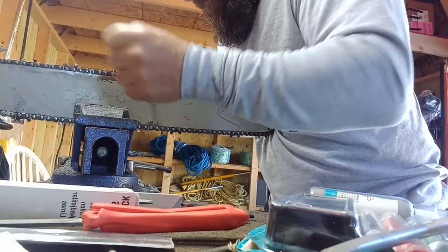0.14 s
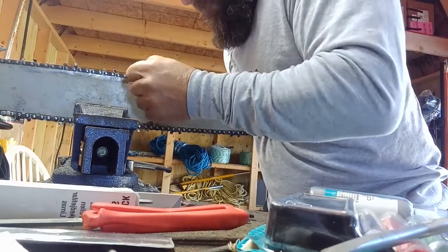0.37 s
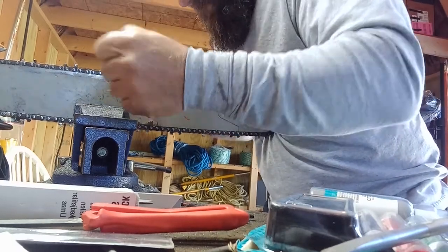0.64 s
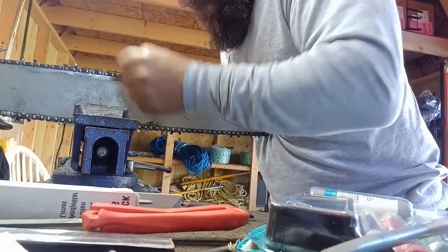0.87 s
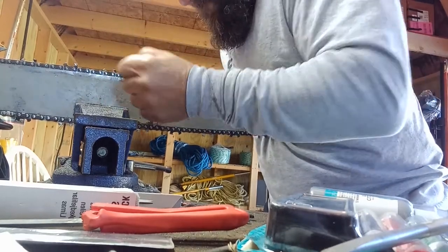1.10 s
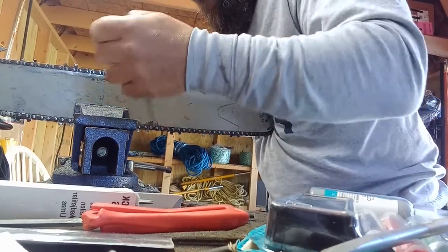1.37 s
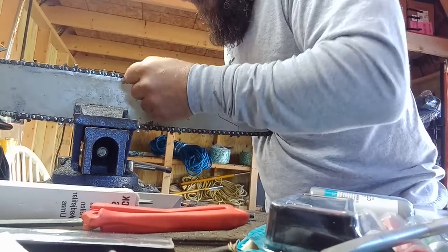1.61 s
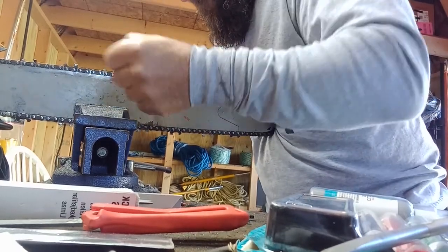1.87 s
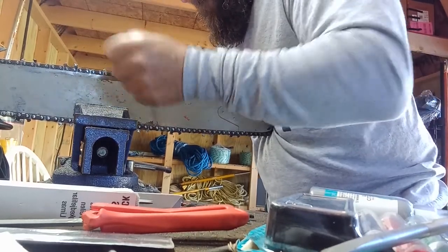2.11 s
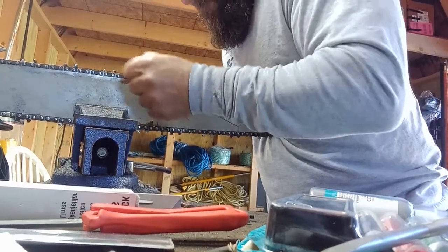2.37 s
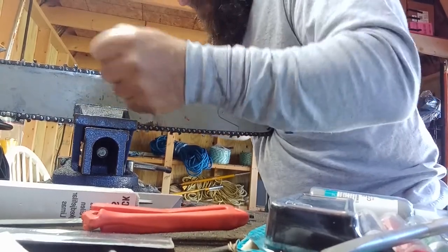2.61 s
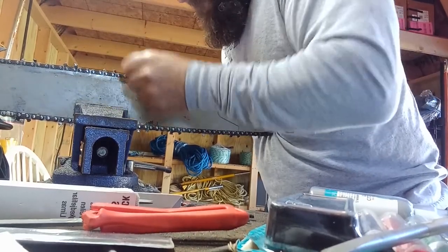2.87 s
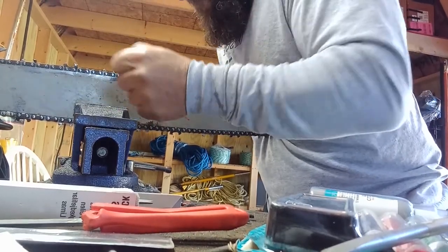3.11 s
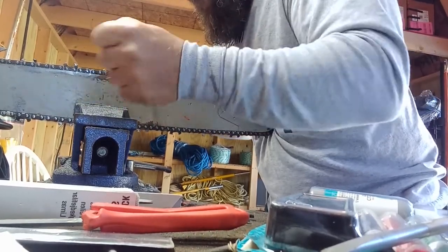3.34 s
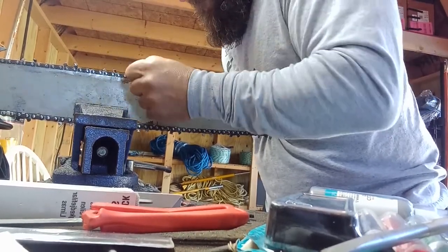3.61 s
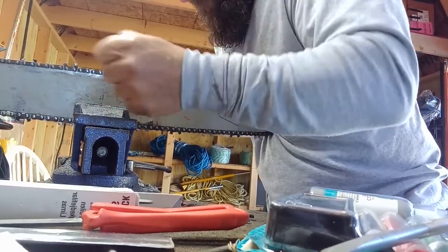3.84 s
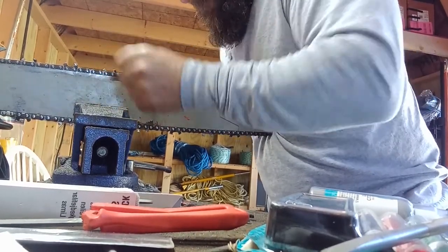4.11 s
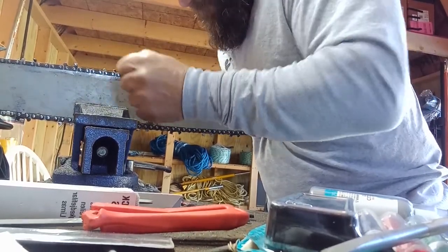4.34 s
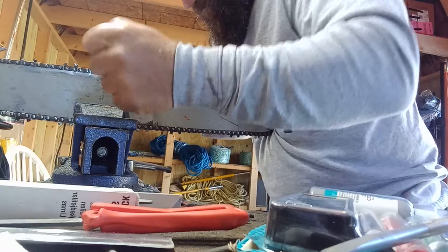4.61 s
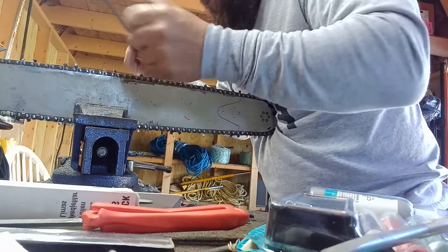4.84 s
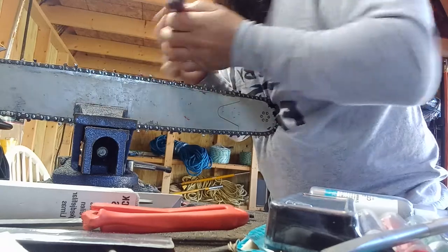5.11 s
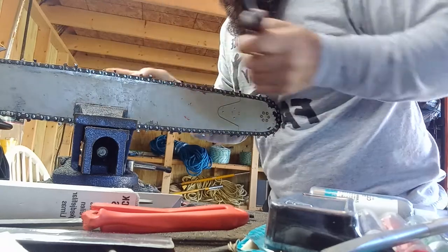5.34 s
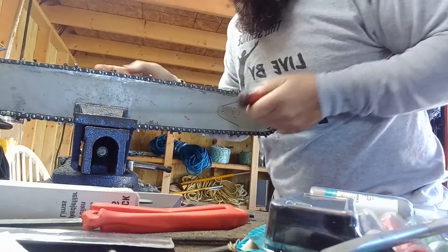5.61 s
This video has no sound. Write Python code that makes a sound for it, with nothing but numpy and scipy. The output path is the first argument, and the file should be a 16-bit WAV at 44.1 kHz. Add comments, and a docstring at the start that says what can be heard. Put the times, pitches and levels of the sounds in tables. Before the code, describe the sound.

In a small wooden shed, a round file makes rasping strokes on a chainsaw chain clamped in a vise, about one every two thirds of a second. Each has gritty mid scrape, ringing steel, jingling links and low bench boom, with small knocks at its ends. Then nearly silent, faint brushing, and a hard steel click. Stereo microphones stand close, on the bench.

```python
"""A round file makes eight strokes across a saw-chain cutter, its steel bar clamped in a vise on a wooden bench.
Random tooth catches ring bar and file, rasp and jingle the links, with chips hissing on top; knocks frame the
strokes. Faint hisses mark the file drawn back, later a hand and sleeve brushing the chain; near the end steel
clicks down. The bench booms, as driven low resonances, into two microphones standing on it; decaying noise
gives the echoes of the wooden shed, filtered noise the quiet air."""
import sys
import numpy as np
from scipy import signal
from scipy.fft import rfft, irfft, next_fast_len
from scipy.io import wavfile

SR = 44100
rng = np.random.default_rng(int(sys.argv[2]) if len(sys.argv) > 2 else 0)


def unload_wav(signal):
    """Save mono or channel-first audio to the path in sys.argv[1] as 16-bit WAV at rate SR, clipped to [-1, 1]."""
    wavfile.write(
        sys.argv[1],
        SR,
        np.round(np.clip(np.atleast_2d(signal).T, -1, 1) * 32767).astype(np.int16),
    )


def gain_from_db(level_db):
    """Convert decibel levels to linear amplitude factors (20 dB per decade)."""
    decades = np.asarray(level_db, float) / 20
    return 10 ** decades


N = 252163

# steel set down on the bench: (time [s], level [dB])
STEEL_CLICK = [(5.6075, -7.5)]
USUAL_BITE_DB, USUAL_TREBLE_DB, USUAL_RING_DB = -31, -39, -38


def rms_one(x):
    """Scales a signal to rms 1."""
    return x / np.sqrt(np.mean(x ** 2) + 1e-20)


def in_time(rows):
    """Gains at every sample from a dB table with time first, silent outside its span."""
    s, *columns = np.transpose(rows)
    t = np.arange(N) / SR
    return np.array([gain_from_db(np.interp(t, s, column, -200, -200)) for column in columns])


def at_hz(points, hz):
    """Reads a spectrum table along a logarithmic pitch axis."""
    points = np.array(points)
    return np.interp(np.log(hz + 1), np.log(points[:, 0] + 1), points[:, 1])


def colour(x, spectrum):
    """Causal (minimum-phase) filter with the given spectrum; white rms 1 comes out at rms 1."""
    size = 8192
    gain = gain_from_db(at_hz(spectrum, np.fft.rfftfreq(size, 1 / SR)))
    cepstrum = irfft(np.log(gain))
    # folding the cepstrum forward puts the energy as early as it can be
    cepstrum[1:size // 2] *= 2
    cepstrum[size // 2 + 1:] = 0
    response = irfft(np.exp(rfft(cepstrum)))[:size // 2]
    response = response / np.sqrt(np.sum(response ** 2))
    return signal.fftconvolve(np.atleast_2d(x), [response], axes=1)[:, :N]


def resonate(x, modes):
    """Parallel resonances, signs alternating; each width sets how fast its mode dies."""
    out = 0
    for k, (hz, width_hz, db) in enumerate(modes):
        r = np.exp(-np.pi * abs(width_hz) / SR)
        a = [1, -2 * r * np.cos(2 * np.pi * hz / SR), r * r]
        b = [(1 - r * r) / 2, 0, (r * r - 1) / 2]
        out = out + (-1) ** k * gain_from_db(db) * signal.lfilter(b, a, x + 1e-18)
    return out


def drift(rate_hz):
    """Slow chance, rms 1: noise through two equal low-pass poles, computed at every 64th sample."""
    r = np.exp(-128 * np.pi * rate_hz / SR)
    noise = rng.standard_normal(N // 64 + 2002)
    slow = signal.lfilter([1], [1, -2 * r, r * r], noise)[2000:]
    return np.interp(np.arange(N) / 64, np.arange(len(slow)), rms_one(slow))


def wandering(x, modes, wander_db, rate_hz):
    """The contact point travels along the file, so each mode is driven now harder, now softer."""
    out = 0
    for k, mode in enumerate(modes):
        drive = x * gain_from_db(wander_db * drift(rate_hz))
        out = out + (-1) ** k * resonate(drive, [mode])
    return out


def grains(per_s, spread_db):
    """Random contacts of uneven size and either sign; rms 1."""
    sizes = gain_from_db(spread_db * np.minimum(rng.exponential(1, N), 4)) * rng.choice([-1, 1], N)
    return rms_one(sizes * (rng.random(N) < per_s / SR))


def impulses(times, sizes, contact_s):
    """Noise bursts that start hard and fall by a factor e in each contact time."""
    train = np.zeros(N)
    train[np.round(np.asarray(times) * SR).astype(int)] = sizes
    dying = np.exp(-np.arange(SR // 4) / (contact_s * SR))
    return signal.fftconvolve(train, dying)[:N] * rng.choice([-1, 1], N)


def plateaus(rows):
    """Gain that fades in, holds and fades out for each row, with 12 ms fades."""
    t = np.arange(N) / SR
    gain = 0
    for s, length, db in rows:
        gain = gain + gain_from_db(db) * np.clip(np.minimum(t - s, s + length - t) / 0.012, 0, 1)
    return gain


def follow(level_db, usual_db, law):
    """A layer's dB from the level that drives it."""
    return law[0] + law[1] * (level_db - usual_db)


def stroke_levels():
    """Bite, treble and ring of the file in dB at every sample, near silent between strokes."""
    # one curve a stroke, from setting the file down to its stop:
    # (time [s], bite level [dB], treble level [dB], level of the file's ring [dB])
    strokes = [
        [(0.0, -30.5, -33.5, -37), (0.024, -35, -39, -43), (0.036, -37.5, -37, -41), (0.048, -44.5, -48, -45),
         (0.052, -36, -51, -48)],
        [(0.301, -48.5, -58.5, -60.5), (0.309, -44, -48, -48.5), (0.349, -45.5, -54, -54),
         (0.415, -42.5, -49, -46), (0.445, -30, -39.5, -33), (0.483, -30, -36.5, -31), (0.537, -28, -39, -43.5),
         (0.623, -33, -34.5, -33.5), (0.679, -37.5, -41.5, -43), (0.693, -33.5, -36.5, -41.5),
         (0.709, -55.5, -48, -52.5), (0.715, -39, -47.5, -53.5)],
        [(0.951, -47, -49, -54.5), (0.957, -43, -47, -45), (0.999, -44.5, -61, -60.5), (1.047, -49, -55.5, -52),
         (1.075, -31.5, -38.5, -36.5), (1.109, -29.5, -37, -31), (1.139, -36, -37, -32.5),
         (1.159, -30.5, -39.5, -39.5), (1.193, -28.5, -35, -39.5), (1.225, -30.5, -36.5, -35.5),
         (1.291, -33, -37.5, -46.5), (1.36, -64.5, -56.5, -62)],
        [(1.603, -51.5, -60.5, -58.5), (1.619, -41, -48, -55.5), (1.689, -58, -65.5, -68),
         (1.711, -39, -45.5, -40.5), (1.741, -33, -40.5, -33), (1.799, -32.5, -37, -39.5),
         (1.833, -28.5, -37.5, -39), (1.891, -31.5, -35, -31.5), (1.961, -37, -40.5, -44.5),
         (1.973, -37, -38.5, -41), (1.983, -45, -46.5, -49), (1.988, -33, -45.5, -45)],
        [(2.203, -57, -61.5, -62), (2.207, -50.5, -50, -57), (2.245, -38, -44, -42), (2.271, -50.5, -55.5, -58),
         (2.313, -42, -50, -50), (2.353, -57.5, -63, -63), (2.385, -34, -38, -38), (2.411, -27, -33, -35.5),
         (2.489, -27, -39.5, -38), (2.505, -28, -35, -34.5), (2.651, -44, -44, -44.5),
         (2.66, -45, -49.5, -49.5)],
        [(2.972, -49.5, -56, -59), (2.976, -44, -52, -53), (3.044, -41.5, -44.5, -42), (3.056, -35, -41.5, -37),
         (3.088, -37.5, -40.5, -33.5), (3.138, -28, -40, -45.5), (3.172, -37.5, -40.5, -36.5),
         (3.228, -37, -43, -39), (3.262, -39.5, -43.5, -52), (3.28, -35.5, -39, -41), (3.294, -66, -51, -54),
         (3.298, -43, -52.5, -54)],
        [(3.575, -71, -60.5, -66), (3.589, -54.5, -66.5, -61), (3.605, -48, -54.5, -56.5),
         (3.661, -38.5, -46.5, -42), (3.677, -39.5, -49, -44.5), (3.709, -33.5, -36, -36),
         (3.775, -30.5, -39.5, -37.5), (3.805, -34.5, -36, -39), (3.875, -37.5, -38, -33.5),
         (3.925, -29.5, -40.5, -48.5), (3.935, -50, -50, -51), (3.94, -28.5, -48, -49.5)],
        [(4.199, -58.5, -54.5, -60.5), (4.209, -47, -55.5, -54), (4.269, -63, -63, -64),
         (4.307, -36.5, -46.5, -38.5), (4.345, -31, -34.5, -39), (4.395, -31, -39, -38.5),
         (4.431, -26, -35.5, -38), (4.487, -26, -34.5, -35), (4.505, -29.5, -35, -36.5),
         (4.539, -32.5, -39.5, -38.5), (4.629, -36.5, -41, -44.5), (4.66, -52, -54, -54.5)],
    ]
    return 20 * np.log10(sum(in_time(stroke) for stroke in strokes))


def quiet_air():
    """Steady filtered noise, independent at the two microphones."""
    # spectrum of the quiet: (frequency [Hz], relative level [dB])
    air_spectrum = [(18, -50.5), (30, -13), (48, 4.5), (88, 11.5), (165, -13.5), (328, -3), (1220, -19.5),
                    (4080, -23), (6900, -13), (8740, -30.5), (9460, -32), (13300, -15.5), (16000, -32)]
    return gain_from_db(-73.5) * colour(rng.standard_normal((2, N)), air_spectrum)


def shed(x):
    """Dense echoes off shelves and rafters, other ones at each microphone, treble dying first."""
    t = np.arange(SR // 2) / SR
    build_up = np.clip(t / 0.015, 0, 1)
    echoes = rng.standard_normal((2, len(t))) * gain_from_db(-60 * t / 0.28) * build_up   # 60 dB down in 0.28 s
    dull = signal.sosfilt(signal.butter(1, 880, fs=SR, output="sos"), echoes)
    echoes = dull + (echoes - dull) * gain_from_db(-60 * t / 0.65)   # the treble's extra loss
    return signal.fftconvolve(x, echoes / np.sqrt(np.sum(echoes ** 2) / 2), axes=1)[:, :N]


def two_ports(x):
    """The direct sound reaches the two microphone ports with a level and phase gap that depend on pitch."""
    # left against right: (frequency [Hz], level [dB])
    left_over_right = [(60, 1), (110, -6), (200, 6), (380, 3), (700, -9), (1290, -1), (2380, -2.5),
                       (4400, -10), (8120, -1), (15000, -21)]
    # left ahead of right: (frequency [Hz], phase [rad])
    left_leads = [(0, 1.5), (860, 1.01), (1720, 0.1), (2150, 6), (2410, -1.5), (4310, -11.5), (5510, -11.5),
                  (6120, -14.5), (7920, -15), (8530, -37), (10200, -13.5), (11200, -33.5), (11900, -33),
                  (16100, 5.5)]
    size = next_fast_len(N + SR // 10)
    hz = np.fft.rfftfreq(size, 1 / SR)
    phase = np.interp(hz, *np.transpose(left_leads))
    half_gap = gain_from_db(at_hz(left_over_right, hz) / 2) * np.exp(0.5j * phase)
    return irfft(np.array([half_gap, 1 / half_gap]) * rfft(x, size), size)[:, :N]


def evened(x, give):
    """A steady push keeps the swing even: the signal is divided by its own envelope; rms 1."""
    envelope = np.abs(signal.hilbert(x, next_fast_len(N))[:N])
    return rms_one(x / (envelope + give * np.std(x)))


def swing(bite_db, law, column):
    """Gain of bench modes that follow the bite, ring out after it, waver, and swell with each lurch."""
    # the vise lurches under the hand: (time [s], top level [dB], legs level [dB], boards level [dB])
    lurches = [(0.005, -16.5, -34.5, -31.5), (0.108, -18.5, -32.5, -39.5), (0.528, -15, -17.5, -23),
               (0.659, -19, -21, -35), (0.741, -23, -27, -39), (0.982, -30.5, -46, -45.5),
               (1.128, -16.5, -26.5, -41.5), (1.198, -22.5, -23.5, -29.5), (1.32, -30, -23.5, -44.5),
               (1.891, -19.5, -20.5, -32), (2.01, -27, -31, -31.5), (2.312, -32, -43.5, -39.5),
               (2.422, -11, -38.5, -43), (2.535, -9, -27, -23.5), (2.621, -15, -24.5, -33.5),
               (2.69, -23.5, -31.5, -36.5), (2.77, -32.5, -36.5, -55), (3.162, -13.5, -34.5, -37.5),
               (3.338, -23.5, -34.5, -40.5), (3.409, -34.5, -35, -57.5), (3.76, -16.5, -25.5, -39),
               (3.83, -13, -25.5, -28.5), (3.96, -17.5, -33, -35), (4.341, -18, -28.5, -44.5),
               (4.432, -15.5, -24, -32.5), (4.528, -14, -29, -26.5), (4.689, -21.5, -35, -42),
               (5.39, -57, -64.5, -69)]
    rise_db_s, fall_db_s, swing_up_s = 302, 255, 0.045
    t = np.arange(N) / SR
    # the level can fall no faster than the ring-out
    held_db = np.maximum.accumulate(follow(bite_db, USUAL_BITE_DB, law) + law[2] * t) - law[2] * t
    r = np.exp(-1 / (swing_up_s * SR))
    power = signal.lfilter([1 - r], [1, -r], gain_from_db(held_db + law[3] * drift(13.0))) ** 2
    for row in lurches:
        below_db = np.maximum(rise_db_s * (row[0] - t), fall_db_s * (t - row[0]))
        power += gain_from_db(row[column] - below_db) ** 2
    return np.sqrt(power)


def bench():
    """The push on the vise keeps the bench modes swinging."""
    # bench resonances, top first, legs second, boards the rest: (frequency [Hz], width [Hz], level [dB])
    bench_modes = [(100.65, 18, 19), (58.85, 38, -4.5), (150, 39.3, -18.5), (201.2, 53, -23),
                   (222, 13, -51.5), (308.5, 58, -24)]
    # how top, legs and boards follow the push:
    # (level at the usual bite [dB], change per change of bite [dB/dB], ring-out [dB/s], waver [dB])
    top_law = (-27.5, 0.52, 142, 3.5)
    legs_law = (-32.5, 0.53, 101, 3.5)
    boards_law = (-44, 0.29, 187.5, 5.5)
    bite_db = stroke_levels()[0]
    shake = rng.standard_normal((3, N))
    # top and legs are resonated twice, for a narrower tone
    top = resonate(resonate(shake[0], bench_modes[:1]), bench_modes[:1])
    legs = resonate(resonate(shake[1], bench_modes[1:2]), bench_modes[1:2])
    boards = resonate(shake[2], bench_modes[2:])
    boom = swing(bite_db, top_law, column=1) * evened(top, give=0.033)
    boom += swing(bite_db, legs_law, column=2) * evened(legs, give=0.13)
    boom += swing(bite_db, boards_law, column=3) * evened(boards, give=0.23)
    return boom


def thud():
    """The click sets the bench modes off once, 3.5 ms late, with a softened blow."""
    # bench under the click: (frequency [Hz], width [Hz], level [dB])
    thud_modes = [(100, 4.0, 8), (103, 22, -4), (58.5, 63, -5.5), (165, 26, -25)]
    blow = np.zeros(N)
    blow[round((STEEL_CLICK[0][0] + 0.0035) * SR)] = 1
    struck = resonate(signal.lfilter([1], [1, -1.96, 0.9604], blow), thud_modes)
    return gain_from_db(-13.5) * struck / np.max(np.abs(struck))


def steel_click():
    """A sharp crack rings steel modes, then loose steel rattles out as random contacts."""
    # ring of the steel: (frequency [Hz], width [Hz], level [dB])
    click_modes = [(6000, 68, 1.5), (6000, 65, -5.5), (6450, 230, -3), (7350, 100, -6.5)]
    # spectra of crack and rattle: (frequency [Hz], relative level [dB])
    crack_spectrum = [(180, -40), (300, -20.5), (1360, -20), (2440, -20), (3030, -18), (3400, -31.5),
                      (4830, -21.5), (5250, -19), (5700, -22.5), (6960, 0.5), (7570, -16), (9390, -35),
                      (13100, -22.5), (14500, -20.5), (16000, -36.5)]
    rattle_spectrum = [(150, -28), (250, -5), (1060, -12.5), (1240, -24), (1530, -24), (1790, -9.5),
                       (2910, -11), (3230, -18.5), (4050, -3.5), (4820, -7.5), (5930, -1), (7060, -13),
                       (9490, -26.5), (13000, -16), (16000, -30.5)]
    (s, level_db), = STEEL_CLICK
    crack = impulses([s], gain_from_db(level_db + 5.5), contact_s=0.0028)
    rattle = impulses([s + 0.0073], gain_from_db(level_db - 16.5), contact_s=0.043)
    rattle = rattle * grains(per_s=7500.0, spread_db=1.0)
    ring = gain_from_db(4) * resonate(crack + rattle, click_modes)
    return ring + gain_from_db(-1.5) * colour(crack, crack_spectrum) + colour(rattle, rattle_spectrum)


def draw_back():
    """Smooth filtered noise: a thin hiss between strokes, a few faint brushes afterwards."""
    # file drawn back lightly over the links: (start [s], length [s], level [dB])
    glides = [(.74, .2, -70.5), (1.4, .15, -77.5), (2.78, 0.26, -81.5), (3.38, 0.24, -73),
              (4.02, .18, -65.5), (5.42, 0.31, -89)]
    # hand and sleeve brush the chain: (start [s], length [s], level [dB])
    brushes = [(5.015, .06, -82), (5.1, 0.055, -74.5), (5.345, 0.041, -81)]
    # spectra of glide and brush: (frequency [Hz], relative level [dB])
    glide_spectrum = [(1470, -46), (2500, -1.5), (2800, -7), (3230, -33), (3500, -3.5), (4040, -0.5),
                      (4690, -5.5), (6150, -2.5), (9490, -30), (12500, -9.5), (13200, -28.5), (14000, -36),
                      (15000, -39)]
    brush_spectrum = [(1470, -55), (2500, -25), (3460, -15), (4760, -23), (6010, 7), (8460, -7.5),
                      (9360, -23), (13000, -2.5), (16000, -8.5)]
    hiss = rng.standard_normal((2, N))
    glide = colour(plateaus(glides) * hiss[0], glide_spectrum)
    return glide + colour(plateaus(brushes) * hiss[1], brush_spectrum)


def slack_links():
    """Gain of slack links that jingle as the file lands or lifts: sudden starts dying away."""
    # (time [s], level [dB], dying time [s])
    slack_rows = [(0.039, -45.5, 0.025), (0.306, -49.5, .04), (0.7, -43.5, .02), (0.953, -62, 0.027),
                  (1.629, -48.5, 0.0096), (2.208, -37, 0.019), (2.238, -37, 0.017), (3.577, -53.5, .012),
                  (4.205, -43.5, 0.011)]
    return sum(np.abs(impulses([s], gain_from_db(db), contact_s=dying_s)) for s, db, dying_s in slack_rows)


def knocks():
    """File knocks on the cutter: a short one-sided push and a longer, brighter noise burst."""
    # (time [s], level [dB], brightness [dB])
    knock_rows = [(0.056, -19, -24), (0.305, -35, 0), (0.689, -30, 6.5), (0.719, -24.5, -22),
                  (0.955, -30, -15), (1.609, -36.5, -9), (1.969, -24, 2), (1.991, -18, -17.5),
                  (2.058, -51.5, 14.5), (2.212, -36.5, 1.5), (2.238, -29, 6), (2.663, -25.5, -3.5),
                  (2.976, -39.5, -16), (3.275, -22, -39.5), (3.302, -26, -9), (3.576, -62, 11.5),
                  (3.607, -38, -8), (3.915, -27.5, -34), (3.942, -21, -9), (4.204, -44, 8),
                  (4.665, -22.5, -8.5), (5.358, -65, -8)]
    s, level_db, bright_db = np.transpose(knock_rows)
    dull = np.abs(impulses(s, gain_from_db(level_db - 0.5), contact_s=0.00043))
    bright = impulses(s, gain_from_db(level_db + bright_db - 5), contact_s=0.004)
    return dull, bright


def steel_bar(bite_db, teeth, catches, dull):
    """Tooth catches and knocks ring the clamped bar, over the broad low grain of the bite."""
    # ring of the bar: (frequency [Hz], width [Hz], level [dB])
    bar_modes = [(618, 8.4, 1.5), (689.5, 16, -7), (774.7, 6.3, 3), (756, 45, -7), (915, 112, 4),
                 (1041, 84, 7.5), (1094, 10, -13.5), (1215, 28, -11.5), (1257, 57, -4.5)]
    # spectrum of the bite: (frequency [Hz], relative level [dB])
    bite_spectrum = [(150, -22.5), (250, -10), (302, -9), (414, -7), (792, 5.5), (955, -3), (1030, 1.5),
                     (1140, -8), (1400, -6.5), (1820, -30), (3080, -120)]
    # (level at the usual bite [dB], change per change of bite [dB/dB])
    bite_law = (-28.5, 1.1)
    bite = gain_from_db(follow(bite_db, USUAL_BITE_DB, bite_law))
    bar = wandering(bite * catches, bar_modes, wander_db=3, rate_hz=9) + resonate(dull, bar_modes)
    bar = gain_from_db(-4.0) * bar / np.std(resonate(teeth, bar_modes))
    return bar + gain_from_db(-3.5) * colour(bite * catches + dull, bite_spectrum)


def file_ring(ring_db, teeth, catches, dull):
    """The same catches, and faintly the knocks, ring the file itself."""
    # the file's own ring: (frequency [Hz], width [Hz], level [dB])
    file_modes = [(1429, 12, -2), (1547, 33, -2), (1621, 200, -6.5), (1780, 86, -0.5)]
    # (level at the usual ring [dB], change per change of ring [dB/dB])
    ring_law = (-35.5, 1.2)
    ring = gain_from_db(follow(ring_db, USUAL_RING_DB, ring_law))
    rung = wandering(ring * catches, file_modes, wander_db=4.0, rate_hz=6.1)
    rung = rung + gain_from_db(-21.0) * resonate(dull, file_modes)
    return gain_from_db(-3.5) * rung / np.std(resonate(teeth, file_modes))


def rasp_and_jingle(treble_db, teeth, chatter, own, bright, slack):
    """The scrape rasps in the air and jingles the links, its pitch patches swelling and fading."""
    # spectra of rasp and jingle: (frequency [Hz], relative level [dB])
    rasp_spectrum = [(1120, -1), (1900, -2), (1980, 1.5), (2060, -1.5), (2600, -1.5), (3170, 0), (4030, -6),
                     (4350, -11), (4900, -26), (6370, -38.5), (10800, -120)]
    jingle_spectrum = [(2710, -29.5), (4600, -3), (4910, -6.5), (5780, 0.5), (6120, 1.5), (6820, -2.5),
                       (8400, -22.5), (8660, -24), (8800, -32.5), (11400, -48), (19400, -120)]
    # (level at the usual treble [dB], change per change of treble [dB/dB])
    rasp_law = (-37, 1.13)
    jingle_law = (-45.5, 0.95)
    rasp = gain_from_db(follow(treble_db, USUAL_TREBLE_DB, rasp_law))
    jingle = gain_from_db(follow(treble_db, USUAL_TREBLE_DB, jingle_law)) + slack
    scrape = rms_one(teeth + chatter * (1.6 * own + 0.5 * rng.standard_normal(N)))
    patches = [(hz, 0.11 * hz, 0) for hz in np.geomspace(1800, 9000, num=24)]
    scrape = rms_one(wandering(scrape, patches, wander_db=2, rate_hz=15))
    rasping = colour(gain_from_db(-2) * rasp * scrape + bright, rasp_spectrum)
    return rasping + colour(gain_from_db(-2.0) * jingle * scrape + 0.33 * bright, jingle_spectrum)


def chip_hiss(treble_db, chatter, own, slack):
    """Chips hiss above as dense random contacts, with the top of the slack links."""
    # spectrum of the chips: (frequency [Hz], relative level [dB])
    chip_spectrum = [(5060, -44), (8600, -7), (8690, -19.5), (9290, -2.5), (10100, -4), (11100, -3.5),
                     (11700, 3.5), (12500, 0.5), (13400, 0.5), (14200, -1), (15400, -4.5), (16200, -18)]
    # (level at the usual treble [dB], change per change of treble [dB/dB])
    chips_law = (-48.5, 1.1)
    chips = gain_from_db(follow(treble_db, USUAL_TREBLE_DB, chips_law)) + gain_from_db(-17.5) * slack
    hiss = rms_one(chatter * (grains(per_s=4500.0, spread_db=1.0) + 0.64 * own))
    return colour(gain_from_db(-3.9) * chips * hiss, chip_spectrum)


def filing():
    """Teeth catch at random; the same catches shake bar and file, rasp in the air and jingle the links."""
    bite_db, treble_db, ring_db = stroke_levels()
    slack = slack_links()
    own = rng.standard_normal((2, N))      # the moving contact sounds a little different at each microphone
    chatter = gain_from_db(0.69 * drift(29.0))      # the file skips unevenly over the edge
    teeth = grains(per_s=1500.0, spread_db=0.5) * chatter
    catches = rms_one(teeth + 0.64 * own)
    dull, bright = knocks()
    work = steel_bar(bite_db, teeth, catches, dull)
    work = work + file_ring(ring_db, teeth, catches, dull)
    work = work + rasp_and_jingle(treble_db, teeth, chatter, own, bright, slack)
    return work + chip_hiss(treble_db, chatter, own, slack)


def scene():
    """Work in the air and in the shed, the bench below it, quiet air around."""
    work, click, boom = filing() + draw_back(), steel_click(), bench()
    # the click is off to one side: it reaches the right 34 samples later, though louder
    click_pair = gain_from_db([[-1.3], [1.3]]) * np.vstack([click, np.roll(click, shift=34)])
    # the bench reaches both microphones through their feet
    below = gain_from_db([[-1.6], [1.2]]) * (boom + thud())
    echoes = shed(gain_from_db(-8.5) * (work + click) + gain_from_db(-15.5) * boom)
    return two_ports(work) + click_pair + below + echoes + quiet_air()


def top_cut(x):
    """Nothing passes above the cut-off."""
    return signal.sosfilt(signal.butter(12, 16530, fs=SR, output="sos"), x)


def record(dry):
    """Small microphones lose the deepest bass, and a steep filter cuts the top."""
    dry = signal.sosfilt(signal.butter(4, 42, "high", fs=SR, output="sos"), dry)
    dry = signal.sosfilt(signal.cheby2(10, 50, 16500, fs=SR, output="sos"), dry)
    return top_cut(dry)


dry = scene()
out = record(dry)
unload_wav(out)
```